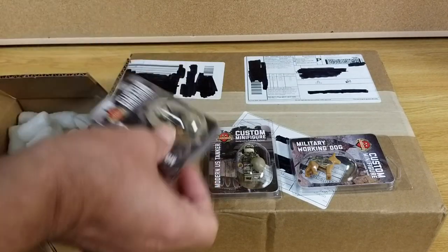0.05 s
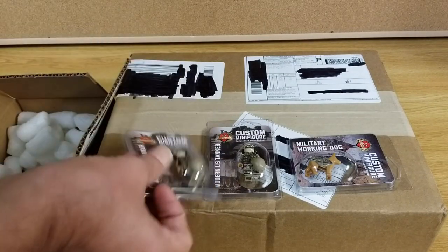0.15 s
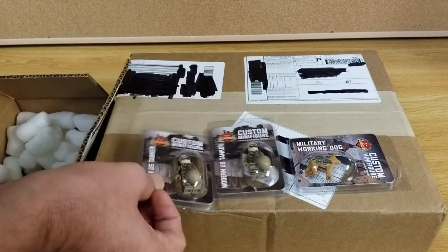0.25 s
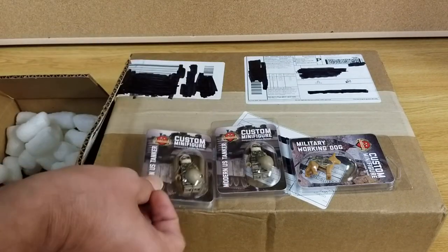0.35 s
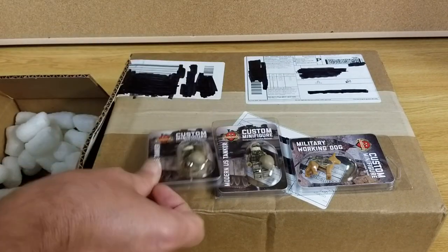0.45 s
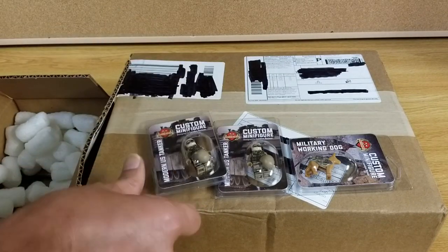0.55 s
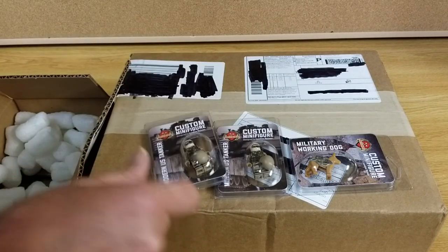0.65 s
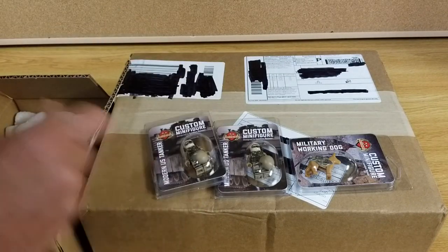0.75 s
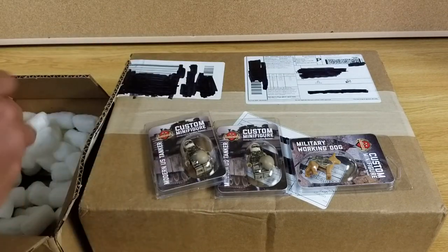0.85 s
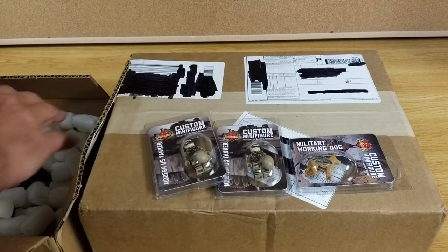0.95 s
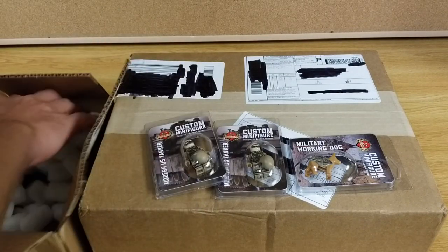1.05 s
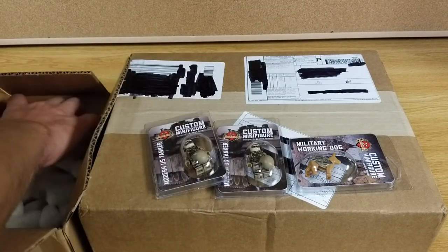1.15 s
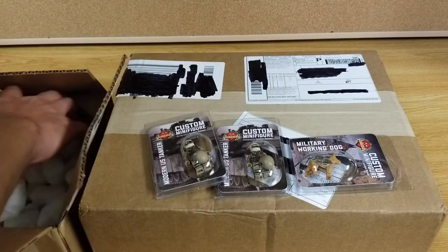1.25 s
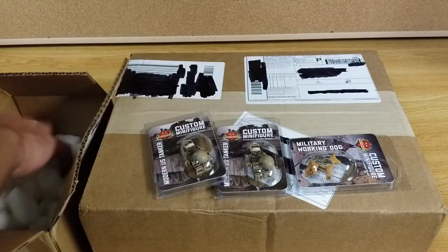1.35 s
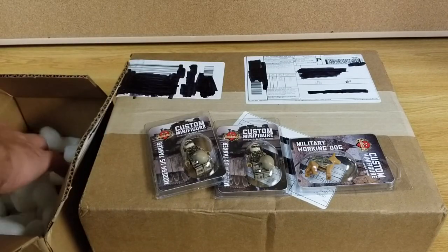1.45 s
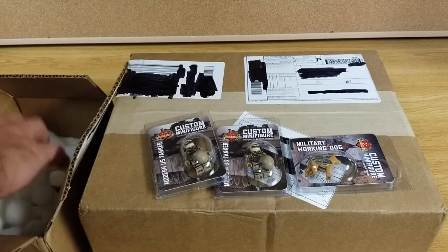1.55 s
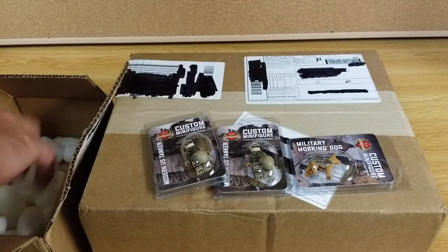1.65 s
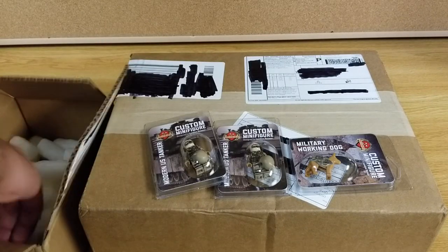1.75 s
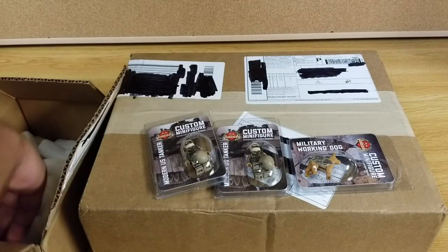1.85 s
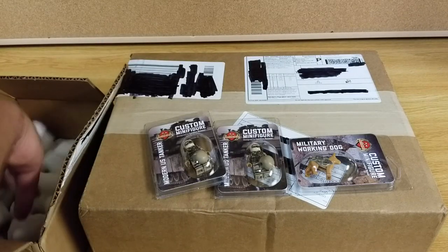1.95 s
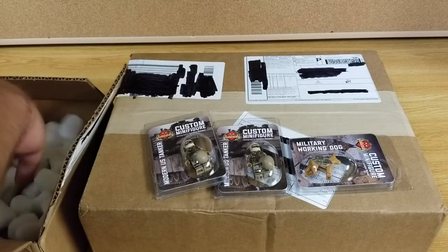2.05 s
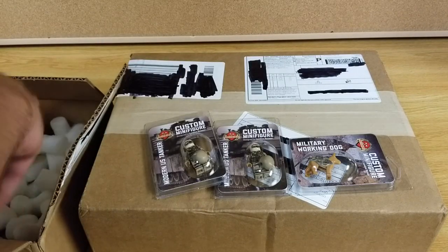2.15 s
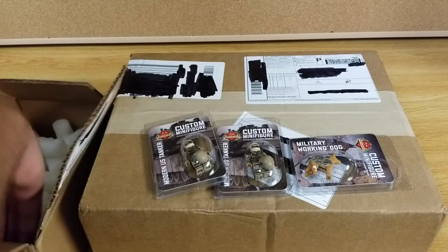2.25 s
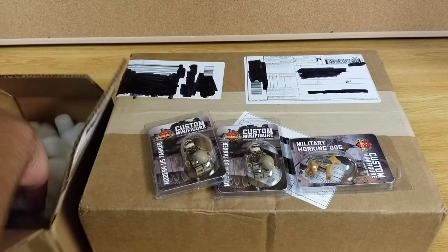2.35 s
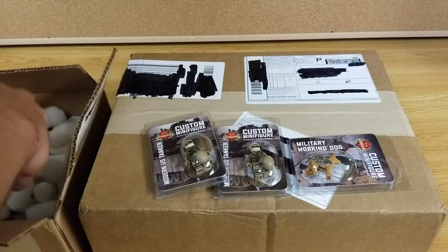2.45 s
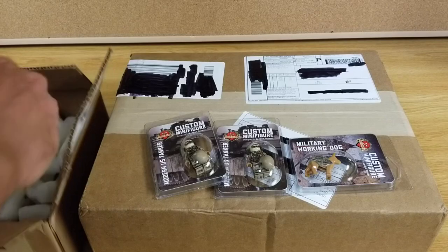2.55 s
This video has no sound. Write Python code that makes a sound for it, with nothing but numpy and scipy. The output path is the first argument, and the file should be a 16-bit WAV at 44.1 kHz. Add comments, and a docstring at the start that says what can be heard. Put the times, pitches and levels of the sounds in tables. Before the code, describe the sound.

Two bursts of plastic clacks ring a hollow cardboard lid, then after a brief lull come carton thuds and bursts of dry foam crunching with tiny squeaks, heard close in a small room.

```python
"""First small plastic blister packs slide, crinkle and knock on a closed cardboard box: noisy blows and
stick-slip friction drive the ringing lid and shells, and soft pushes make the cardboard boom.
Then a hand bumps an open carton and brushes and stirs its foam packing peanuts: dense grains crunch,
pitched blows crack or squeak shortly, slips rub in the hollow, and late on two runs of jerks squeak.
A low rumble, faint hiss and thin whines last throughout; a small room reflects what is handled."""
import sys
import numpy as np
from scipy import signal
from scipy.fft import rfft, irfft
from scipy.io import wavfile
from scipy.ndimage import map_coordinates

SR = 44100
rng = np.random.default_rng(int(sys.argv[2]) if len(sys.argv) > 2 else 0)


def unload_wav(signal):
    """Save mono or channel-first audio to the path in sys.argv[1] as 16-bit WAV at rate SR, clipped to [-1, 1]."""
    wavfile.write(
        sys.argv[1],
        SR,
        np.round(np.clip(np.atleast_2d(signal).T, -1, 1) * 32767).astype(np.int16),
    )


N = 116865
T = np.arange(N) / SR  # time axis in seconds


def from_db(db):
    """Decibels to gain."""
    return 10 ** (np.asarray(db) / 20)


def rms_one(x):
    """Scale to rms 1."""
    return x / np.sqrt(np.mean(x ** 2) + 1e-20)


def unit_energy(x):
    """Scale a response so that it keeps the power of white noise."""
    return x / np.sqrt(np.sum(x ** 2) + 1e-20)


def level(rows):
    """Gain over time from a curve of (seconds, dB); silent before it starts."""
    times, db = np.transpose(rows)
    return from_db(np.interp(T, times, db)) * (T >= times[0])


def through(x, response):
    """Play a signal through an impulse response."""
    return signal.fftconvolve(x, response)[:N]


def colour(x, points, size=8192):
    """Causal minimum-phase filter with the given spectral shape, scaled to unit energy."""
    hz, db = np.transpose(points)
    grid = np.maximum(np.fft.rfftfreq(size, 1 / SR), 1)
    gain = from_db(np.interp(np.log(grid), np.log(hz), db))
    # folding the cepstrum onto positive time makes the phase minimal
    cepstrum = irfft(np.log(gain))
    cepstrum[1:size // 2] *= 2
    cepstrum[size // 2 + 1:] = 0
    response = irfft(np.exp(rfft(cepstrum)))[:size // 2]
    return through(x, unit_energy(response))


def ring(x, modes):
    """A body of decaying sines with alternating signs; each dB is the mode's relative energy."""
    t = T[:SR // 2]
    body = np.zeros(len(t))
    for k, (hz, db, t60) in enumerate(modes):
        decay = np.exp(-np.log(1000) * t / t60)
        mode = unit_energy(np.sin(2 * np.pi * hz * t) * decay)
        body += (-1) ** k * from_db(db) * mode
    return through(x, unit_energy(body))


def soften(x, hz):
    """First-order low-pass."""
    return signal.sosfilt(signal.butter(1, hz, fs=SR, output="sos"), x)


def drift(rate):
    """Random curve: normal knots of spread 1, rate per second, joined by straight lines."""
    knots = rng.standard_normal(4096)
    return np.interp(T * rate, np.arange(len(knots)), knots)


def clicks(rows, axis=1):
    """One impulse per row, as strong as the given dB column."""
    out, rows = np.zeros(N), np.array(rows)
    out[(rows[:, 0] * SR).astype(int)] = from_db(rows[:, axis])
    return out


RATTLE_ABOVE_HZ = 590


def contacts(rows, rattle_s, click):
    """Force of the blows: a click and a brief dying chatter, duller where a low brightness is given."""
    out, t = np.zeros(N + SR), T[:SR // 10]
    for s, db, *bright in rows:
        chatter = rng.standard_normal(len(t)) * np.exp(-t / rattle_s)
        force = unit_energy(chatter - soften(chatter, RATTLE_ABOVE_HZ))
        force[0] += click
        force = unit_energy(force)
        if bright:
            force = soften(force, bright[0])
        start = int(s * SR)
        out[start:start + len(t)] += from_db(db) * force
    return out[:N]


def slips(per_s, spread_db, clump_db, clump_rate):
    """Stick-slip friction: tiny random clicks of uneven size that come in clumps; rms 1."""
    unevenness = np.minimum(rng.exponential(1, N), 4)
    sizes = from_db(spread_db * unevenness) * rng.choice([-1, 1], N)
    happens = rng.random(N) < per_s / SR
    clumps = from_db(clump_db * drift(clump_rate))
    return rms_one(sizes * happens * clumps)


# Rumble spectrum. Each row: frequency in Hz, relative density in dB.
RUMBLE_COLOUR = [(20, -73), (40, -17), (60, -5.5), (95, -2), (125, 0), (180, -5.5), (300, -10.5),
                 (450, -19), (700, -31), (1600, -38), (3000, -79), (16000, -136)]
# Hiss spectrum. Each row: frequency in Hz, relative density in dB.
HISS_COLOUR = [(300, 1), (3000, 1.5), (4000, 3.1), (5500, 10.2), (6400, 8.8), (7300, 8.9), (9500, 9.4),
               (12000, 6.3), (16000, 4.5)]
# Hiss level before random variation. Each row: time in seconds, level in dB.
HISS_LEVEL = [(0, -55.5), (0.17, -52.5), (0.42, -57), (0.9, -57.5), (0.98, -60.5), (1.5, -52.5),
              (1.69, -61), (1.85, -57), (2.2, -55), (2.65, -55)]
# Thin whines. Each row: frequency in Hz, relative energy in dB, t60 in seconds.
WHINE_MODES = [(6390, 0, .06), (8270, -6, 0.055)]
RUMBLE_DB, WHINE_DB = -47, -69
HISS_VARIATION_DB, HISS_VARIATIONS_PER_S = 4.2, 320  # random level variation: spread, knots per second


def background():
    """Noise shaped into low ventilation rumble and faint hiss, and rung into thin high whines."""
    rumble = from_db(RUMBLE_DB) * colour(rng.standard_normal(N), RUMBLE_COLOUR)
    variation = from_db(HISS_VARIATION_DB * drift(HISS_VARIATIONS_PER_S))
    hiss = level(HISS_LEVEL) * variation * colour(rng.standard_normal(N), HISS_COLOUR)
    whine = from_db(WHINE_DB) * ring(rng.standard_normal(N), WHINE_MODES)
    return rumble + hiss + whine


# Packs slide on the lid. Each row: time in seconds, level in dB.
SLIDE = [(0, -73), (0.178, -64.5), (0.186, -46), (0.208, -44), (0.218, -36), (0.268, -34.5), (0.305, -38),
         (0.345, -47.5), (0.44, -53), (0.49, -50), (0.542, -39.5), (0.558, -29), (0.59, -35.5),
         (0.635, -34), (0.69, -43.5), (0.74, -48), (0.78, -94), (0.85, -99)]
# Spectrum of the slide. Each row: frequency in Hz, relative density in dB.
SLIDE_COLOUR = [(100, -37.5), (300, 1), (600, -8), (1200, 0.5), (1800, -3), (2300, -11.5), (3100, -9),
                (5500, -17.5), (8000, -22), (16000, -34)]
# A pack knocks on the lid or its neighbour.
# Each row: start in seconds, clack level in dB, brightness in Hz, drive of the lid's ring in dB before trim.
KNOCKS = [(0.1835, -30, 3500, -26), (0.2115, -27, 3000, -14), (0.222, -18, 5000, -13.5),
          (0.254, -16, 6000, -32), (0.2738, -1.5, 2000, 0.5), (0.281, -7, 1600, -0.5),
          (0.5426, 0, 3020, -7.5), (0.5455, 8, 4500, -13), (0.5488, 4, 3980, -2.5), (0.5526, 0, 3380, 3.5),
          (0.562, -9, 2500, -7), (0.612, -14, 6000, -16), (0.684, -19, 2500, -10.5)]
# Spectrum of the clacks. Each row: frequency in Hz, relative density in dB.
KNOCK_COLOUR = [(60, -25), (220, -32), (400, -1.5), (720, 10), (1050, 7), (1650, 2.5), (2200, -12),
                (3100, -5.5), (6000, -12), (16000, -19)]
# Ringing box lid. Each row: frequency in Hz, relative energy in dB, t60 in seconds.
LID_MODES = [(235.7, -7.5, 0.62), (427.5, 4.5, 0.12), (582, 4, 0.13), (643, 1.5, 0.12), (770, -6.5, 0.19),
             (1045, -0.5, 0.257), (1197, -1, 0.19), (1210, -2, 0.2), (1348, -3.5, 0.15), (1480, -5, 0.16),
             (1763, -8.5, 0.12), (1867, -9, 0.12), (1965, -13, .14), (2970, -9, 0.03)]
# A thin plastic shell snaps. Each row: start in seconds, level in dB.
SNAPS = [(0.1813, -11), (0.2222, -18), (0.230, -23), (0.253, -25), (0.2715, -18.5), (0.598, -23)]
# The shell crinkles as fingers press it down. Each row: time in seconds, level in dB before trim.
CRINKLE = [(0.205, -60), (0.215, -42), (0.27, -44.5), (0.315, -54), (0.35, -60), (0.4, -120)]
# Ringing plastic shell. Each row: frequency in Hz, relative energy in dB, t60 in seconds.
SHELL_MODES = [(2934, -2.5, 0.015), (4300, 4.5, 0.018), (4550, 6.5, 0.016), (5430, -2, .007),
               (6470, -10, .015), (8760, -5.5, .012), (10200, -14, 0.012)]
KNOCK_RATTLE_S, KNOCK_RING_DB = 0.0048, -1
SLIPS_PER_S, SLIDE_RING_DB = 1600, -10
SNAP_RATTLE_S, SNAP_CRACK_DB = 0.0013, -14
CRINKLES_PER_S, CRINKLE_DB = 350, -5


def packs():
    """Friction and blows excite the box lid; snaps and crinkling excite the thin plastic shells."""
    drag = slips(SLIPS_PER_S, spread_db=1.0, clump_db=2.0, clump_rate=120) * level(SLIDE)
    blows = contacts(KNOCKS, KNOCK_RATTLE_S, click=0.46)
    lid_drive = from_db(KNOCK_RING_DB) * clicks(KNOCKS, axis=3) + from_db(SLIDE_RING_DB) * drag
    lid = ring(lid_drive, LID_MODES)
    snaps = contacts(SNAPS, SNAP_RATTLE_S, click=0.56)
    crinkle = slips(CRINKLES_PER_S, spread_db=1.0, clump_db=3.0, clump_rate=120) * level(CRINKLE)
    shell = ring(snaps + from_db(CRINKLE_DB) * crinkle, SHELL_MODES)
    direct_snaps = from_db(SNAP_CRACK_DB) * snaps
    return colour(blows, KNOCK_COLOUR) + colour(drag, SLIDE_COLOUR) + lid + shell + direct_snaps


# Soft pushes of the hand boom the cardboard. Each row: start in seconds, level in dB.
PUSHES = [(0.205, -7.5), (0.275, -3.5), (0.543, -5), (0.645, -12.5), (0.682, -8.5), (1.045, -10),
          (1.225, -12.5), (1.46, -9), (1.89, -13), (2.36, -10)]
# Cardboard boom. Each row: frequency in Hz, relative energy in dB, t60 in seconds.
BOOM_MODES = [(96.6, 7.6, 0.05), (107, 6.4, 0.31), (137.9, 15, 0.26)]
# The hand bumps the open carton. Each row: start in seconds, level in dB, brightness of the blow in Hz.
BUMPS = [(1.0392, 3.5, 900), (1.0495, -12, 600), (1.060, 8, 402), (1.071, -1.5, 500), (1.085, -7, 1200),
         (1.102, -14, 1800), (1.541, -19, 1500), (2.2274, -2.5, 905), (2.247, -10.5, 2000),
         (2.262, -5.5, 2500), (2.458, -17, 1480), (2.593, -18, 1500), (2.61, -13.5, 1800)]
# Spectrum of the bumps. Each row: frequency in Hz, relative density in dB.
BUMP_COLOUR = [(40, -16), (130, 10), (300, -10.5), (600, 3.5), (1100, -20), (3000, -21), (12000, -100)]
# Ringing carton walls. Each row: frequency in Hz, relative energy in dB, t60 in seconds.
CARTON_MODES = [(240.3, 10.2, 0.14), (311.6, 12.7, 0.18), (351, 10.6, 0.063), (453.5, 4.6, 0.1),
                (566, 0.89, 0.096)]
BUMP_RATTLE_S, BUMP_RING_DB = 0.004, -4


def carton():
    """Pushes set off low cardboard modes; bumps thud and ring the carton walls."""
    boom = ring(clicks(PUSHES), BOOM_MODES)
    blows = contacts(BUMPS, BUMP_RATTLE_S, click=0.31)
    walls = from_db(BUMP_RING_DB) * ring(clicks(BUMPS), CARTON_MODES)
    return boom + colour(blows, BUMP_COLOUR) + walls


POPS_PER_S, POP_CYCLES, POP_LOW_HZ, POP_HIGH_HZ = 420, 11, 1310, 9100  # cycles: t60 in periods


def pops():
    """Single cells of foam give way, each ringing briefly at one of ten pitches; rms 1."""
    grains = slips(POPS_PER_S, spread_db=3.0, clump_db=0.5, clump_rate=60)
    pitches = np.geomspace(POP_LOW_HZ, POP_HIGH_HZ, 10)
    dealt = rng.integers(0, len(pitches), N)
    out = np.zeros(N)
    for k, hz in enumerate(pitches):
        out += ring(grains * (dealt == k), [(hz, 0, POP_CYCLES / hz)])
    return rms_one(out)


# Crunch of the stirred peanuts. Each row: time in seconds, level in dB before the layer trims.
CRUNCH = [(1.0, -83), (1.036, -56), (1.042, -44.5), (1.10, -41.5), (1.15, -41.5), (1.19, -50.5),
          (1.24, -46), (1.31, -45), (1.352, -38.5), (1.40, -44), (1.44, -51.5), (1.53, -57), (1.60, -66.5),
          (1.722, -79), (1.742, -54), (1.765, -43.5), (1.85, -50.5), (1.882, -37.5), (1.935, -45.5),
          (1.975, -51), (2.055, -65.5), (2.068, -52), (2.222, -72), (2.229, -49.5), (2.27, -45.5),
          (2.355, -38.5), (2.44, -54.5), (2.50, -51), (2.65, -52)]
# Spectrum of the crunch. Each row: frequency in Hz, relative density in dB.
CRUNCH_COLOUR = [(100, -10), (400, 0.5), (900, -1), (1400, 2), (2000, -1.5), (3500, -1), (6000, -1.5),
                 (7500, -7), (9300, -6), (11500, -13), (16000, -17)]
# Peanuts rub on the carton walls. Each row: time in seconds, level in dB before trim.
RUB = [(1.04, -46), (1.10, -32.5), (1.19, -49.5), (1.25, -42), (1.31, -45), (1.35, -34), (1.40, -40),
       (1.45, -50.5), (1.72, -56), (1.76, -44.5), (1.81, -43), (1.85, -57), (1.885, -39.5), (1.935, -39.5),
       (1.99, -53.5), (2.22, -58.5), (2.235, -41), (2.30, -43), (2.35, -36), (2.44, -46.5), (2.57, -64.5),
       (2.605, -50), (2.65, -70)]
# Hollow resonances of the rub before shifting.
# Each row: frequency in Hz, relative energy in dB, t60 in seconds.
RUB_MODES = [(352.6, -3.5, 0.037), (423, -3.5, 0.057), (592, -0.5, 0.052), (731.5, -0.5, 0.034),
             (783, 3.5, 0.028), (901, -1, 0.015), (1031, -7, 0.054)]
# Single peanuts crack or give one short squeak. Each row: start in seconds, level in dB, pitch in Hz.
CHIRPS_AND_CRACKS = [(1.085, -16, 3160), (1.103, -14, 2400), (1.13, -22, 8400), (1.244, -23, 5000),
                     (1.4865, -14.5, 1310), (1.5405, -23, 900), (1.885, -16, 4800), (2.063, -27.5, 2520),
                     (2.232, -30, 1550), (2.254, -21, 1500), (2.271, -16, 1800), (2.60, -24, 2000)]
CRUNCH_GRAINS_PER_S, CRUNCH_DB, POP_DB = 2500, 1.5, -6.5
RUB_SLIPS_PER_S, RUB_DB = 1000, 1
CAVITY_SHIFT, CAVITY_SHIFTS_PER_S = 0.07, 14  # spread of the log pitch, knots per second
SINGLE_RATTLE_S, SINGLE_CYCLES = 0.0012, 8.5  # cycles: t60 in periods


def foam():
    """Peanuts crunch, pop, rub and crack or squeak shortly; hollow modes shift as the hand moves inside."""
    stir = level(CRUNCH)
    grains = slips(CRUNCH_GRAINS_PER_S, spread_db=0.5, clump_db=0.8, clump_rate=130) * stir
    crunch = from_db(CRUNCH_DB) * colour(grains, CRUNCH_COLOUR)
    popping = from_db(POP_DB) * pops() * stir
    rubbing = slips(RUB_SLIPS_PER_S, spread_db=0.0, clump_db=1.2, clump_rate=70)
    hollow = ring(rubbing, RUB_MODES)
    # reading the sound at an uneven speed moves its pitch
    speed = np.exp(CAVITY_SHIFT * drift(CAVITY_SHIFTS_PER_S))
    shifted = map_coordinates(hollow, [np.cumsum(speed)], mode="mirror")
    rub = from_db(RUB_DB) * shifted * level(RUB)
    singles = np.zeros(N)
    for s, db, hz in CHIRPS_AND_CRACKS:
        blow = contacts([(s, db)], SINGLE_RATTLE_S, click=0.85)
        singles += ring(blow, [(hz, 0, SINGLE_CYCLES / hz)])
    return crunch + popping + rub + singles


# Fingers brush the top of the peanuts. Each row: start in seconds, level in dB before attack and fade.
BRUSHES = [(1.016, -48), (1.728, -44), (2.49, -50)]
# Spectrum of the brushing. Each row: frequency in Hz, relative density in dB.
BRUSH_COLOUR = [(1500, -34), (4000, -5), (6000, 4), (10000, 2), (12500, -8), (16000, -17)]
BRUSH_ATTACK_S, BRUSH_FADE_DB_PER_S = 0.0085, 202


def brushes():
    """A light touch on the foam gives only a high, fine rustle."""
    touch = np.zeros(N)
    for s, db in BRUSHES:
        attack = np.clip((T - s) / BRUSH_ATTACK_S, 0, 1)
        touch += attack * from_db(db - BRUSH_FADE_DB_PER_S * np.maximum(T - s, 0))
    grains = slips(CRUNCH_GRAINS_PER_S, spread_db=0.0, clump_db=1.5, clump_rate=210)
    return colour(touch * grains, BRUSH_COLOUR)


# Foam squeaks against foam. Each row: start in seconds, length in seconds, starting level in dB,
# starting slip rate in Hz before jitter, roughness as spread of the log rate.
SQUEAKS = [(2.073, 0.046, -38, 330.3, .25), (2.121, .03, -48, 261, .25)]
# Squeak resonances. Each row: frequency in Hz, relative energy in dB, t60 in seconds.
SQUEAK_MODES = [(911, 5.3, 0.04), (1080, 1, 0.032), (1304, 2.9, 0.024)]
SQUEAK_SAG_HZ_PER_S, SQUEAK_FADE_DB_PER_S, SQUEAK_GRAIN_DB = 1500, 93, 1


def squeaks():
    """A pinched peanut jerks loose and creaks on in fading, uneven slips that slow as the grip eases."""
    out = np.zeros(N)
    for s, length, db, hz, rough in SQUEAKS:
        age = np.clip(T - s, 0, length)
        sliding = (T >= s) * (T < s + length)
        rate = (hz - SQUEAK_SAG_HZ_PER_S * age) * np.exp(rough * drift(450)) * sliding
        # one impulse as each slip cycle begins, scaled to rms 1 at the starting rate
        cycles = np.cumsum(rate) / SR
        jerks = np.diff(np.ceil(cycles), prepend=0) * np.sqrt(SR / hz)
        out += jerks * from_db(db - SQUEAK_FADE_DB_PER_S * age + SQUEAK_GRAIN_DB * drift(250))
    return ring(out, SQUEAK_MODES)


ROOM_DB, ROOM_DELAY_S, ROOM_SPLIT_HZ = -7.5, 0.00441, 5400
ROOM_T60_S, ROOM_TREBLE_T60_S = 0.24, 0.16


def room(x):
    """Diffuse reflections of a small room as decaying noise; the treble dies sooner."""
    t, white = T[:SR // 2], rng.standard_normal(SR // 2)
    low = soften(white, ROOM_SPLIT_HZ)
    low_tail = low * np.exp(-np.log(1000) * t / ROOM_T60_S)
    treble_tail = (white - low) * np.exp(-np.log(1000) * t / ROOM_TREBLE_T60_S)
    tail = (low_tail + treble_tail) * (t > ROOM_DELAY_S)
    return from_db(ROOM_DB) * through(x, unit_energy(tail))


def scene():
    """Everything handled, its room and the background, as one channel."""
    near = packs() + carton() + foam() + brushes() + squeaks()
    return (near + room(near) + background())[None]


CUTOFF_HZ = 15900


def record(dry):
    """The top is cut steeply by an elliptic low-pass."""
    # order 12, 0.1 dB ripple, 80 dB rejection
    return signal.sosfilt(signal.ellip(12, .1, 80, CUTOFF_HZ, fs=SR, output="sos"), dry)


dry = scene()
out = record(dry)
unload_wav(out)
```